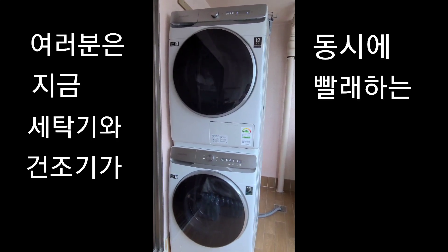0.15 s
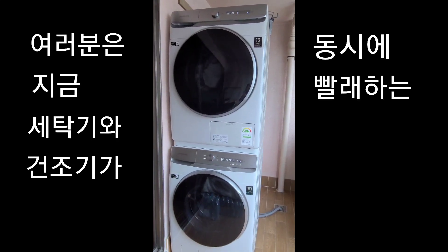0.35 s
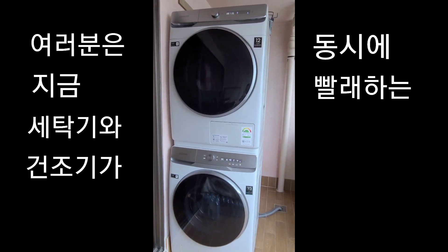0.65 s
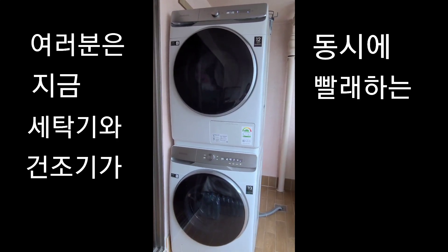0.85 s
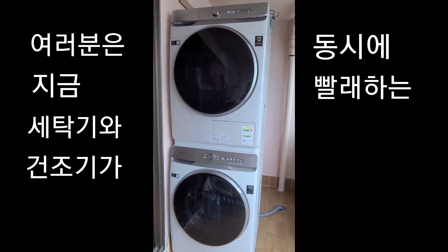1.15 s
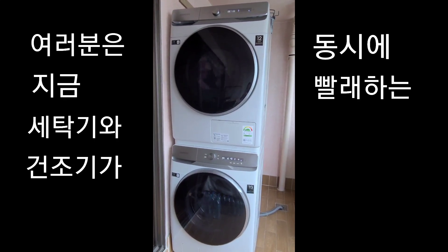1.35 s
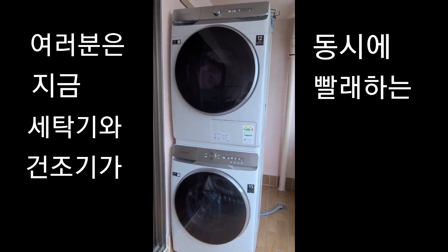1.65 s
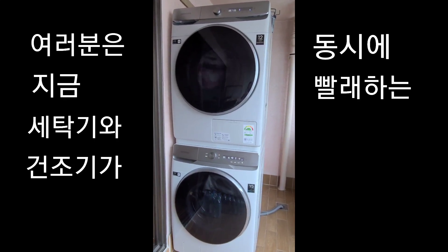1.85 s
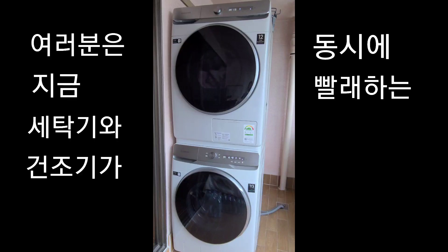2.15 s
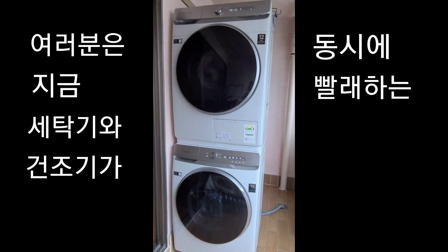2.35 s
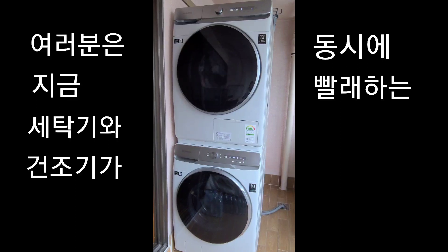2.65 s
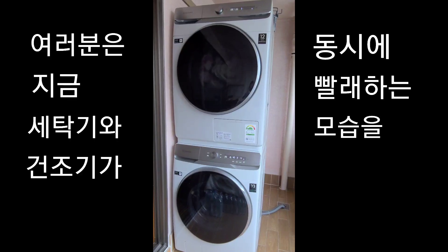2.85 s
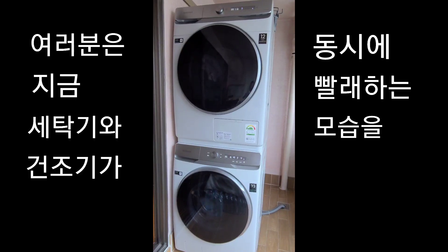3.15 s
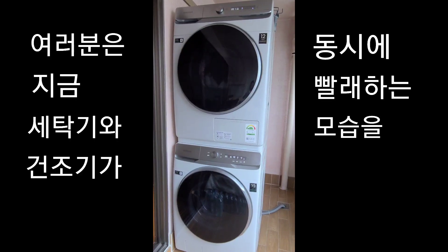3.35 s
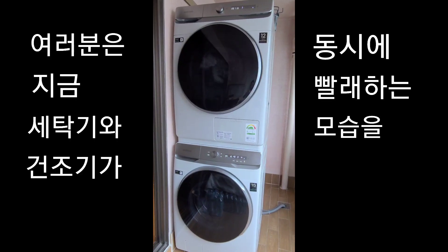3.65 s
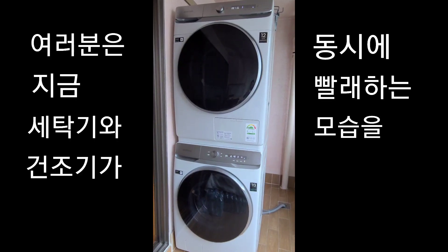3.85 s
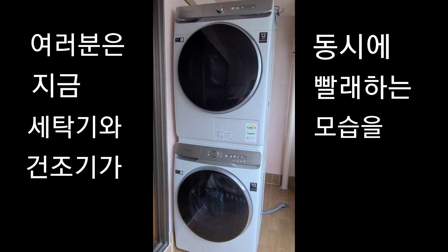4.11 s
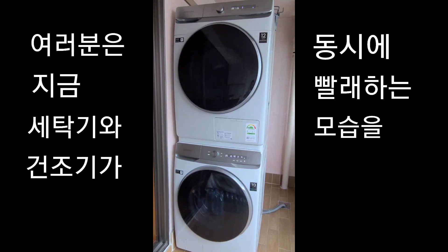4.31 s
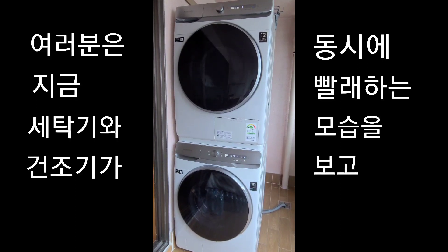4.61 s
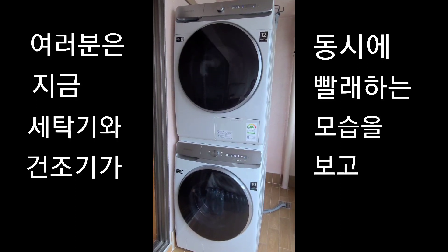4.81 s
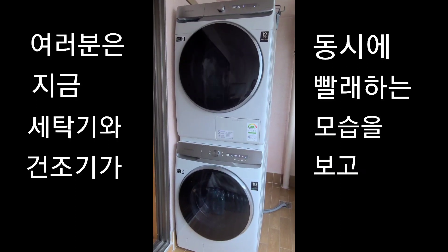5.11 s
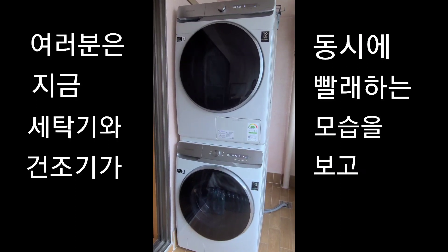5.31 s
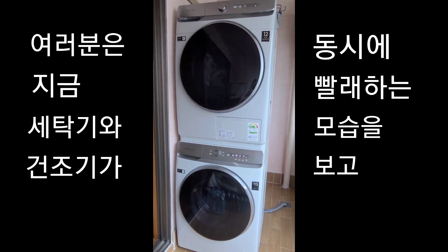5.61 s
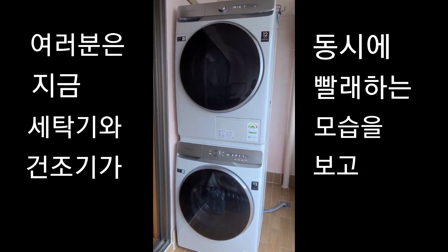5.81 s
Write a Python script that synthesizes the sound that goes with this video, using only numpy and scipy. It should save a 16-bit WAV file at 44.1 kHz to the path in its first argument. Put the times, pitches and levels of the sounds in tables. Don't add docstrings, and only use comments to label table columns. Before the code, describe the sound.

Two laundry machines drone together indoors without stopping. Low compressor and fan hum, a side-panel drone and soft cabinet booms form the bed, topped by unsteady whine, faint buzz and thin airy hiss. Thuds and button knocks scatter throughout; bright ticks cluster in the first half and nearly vanish afterward. Quiet, bass-heavy stereo phone pickup in a small room with little echo.

```python
import sys
import numpy as np
from scipy import signal
from scipy.fft import rfft, irfft, next_fast_len
from scipy.io import wavfile
from scipy.ndimage import uniform_filter1d

SR = 44100
rng = np.random.default_rng(int(sys.argv[2]) if len(sys.argv) > 2 else 0)


def generate_wav(signal):
    frames = np.transpose(np.atleast_2d(signal))
    scaled = np.clip(frames, -1, 1) * 32767
    pcm = np.round(scaled).astype(np.int16)
    wavfile.write(sys.argv[1], SR, pcm)


def linear_from_db(decibels):
    return 10 ** (np.asarray(decibels, float) / 20)


N = 263277

# (frequency [Hz], likeness [0-1], left lead [rad], left minus right [dB])
MIC_PORTS = [(40, .995, .38, -2.3), (120, .95, .2, -1.4), (210, .95, .3, 0), (280, .9, .38, .4),
             (380, .82, 0, .5), (500, .68, -.3, .5), (660, .15, -.6, .5), (900, .35, 1.1, .4),
             (1080, .68, 2.5, 0), (1300, .55, 3.3, -.3), (1900, .3, 3.8, .5), (2300, .45, 6.2, 1.5),
             (3500, .15, 5, .8), (15000, .03, 6, 2.5)]
# (time [s], level [dB])
BUSTLE = [
    (0, 0),
    (.9, 0.5),
    (1.6, 0.5),
    (2.5, 0.7),
    (3.3, 0),
    (4.2, -0.5),
    (5, -0.6),
    (5.97, -0.3),
]
# (time [s], pitch [Hz], level [dB])
PANEL_SWELLS = [(.08, 77.9, -42), (.5, 76, -42.5), (.7, 72, -44), (.97, 76, -47), (1.12, 74.47, -55),
                (2.0, 73, -45), (2.33, 78.9, -39), (2.64, 76.3, -40.5), (2.95, 72.54, -40),
                (3.46, 72.4, -40.5), (3.95, 72, -41), (4.18, 75.5, -43), (4.47, 71.9, -42.5),
                (4.61, 75, -42.5), (4.78, 77.9, -45), (5.3, 75.25, -41.5), (5.57, 73.5, -38),
                (5.76, 75.7, -41.5)]
# (time [s], pitch [Hz], level [dB])
WHINE_SWELLS = [(.07, 770, -51), (.25, 758.3, -50.5), (.47, 768, -47), (0.609, 758, -48),
                (1.04, 761, -46.5), (1.3, 763.5, -53.5), (1.69, 768, -48), (1.88, 770, -48.5),
                (2.2, 765, -45.5), (2.45, 764, -45.5), (2.77, 775, -48.5), (3.029, 759, -45.5),
                (3.37, 762, -49), (3.55, 765.6, -46), (4.0, 756, -49.5), (4.25, 762.4, -47),
                (4.5, 754, -45), (4.8, 770, -50), (5.17, 765.4, -47.5), (5.4, 770, -50.5), (5.7, 759, -44),
                (5.85, 762, -52.5)]
# (frequency [Hz], width [Hz], level [dB])
HOUSING_RINGS = [(4180, 240, -3), (4410, 130, 0), (4670, 140, 0), (5150, 200, -11)]
# (frequency [Hz], width [Hz], level [dB])
DRIVE_WHISTLES = [(8400, 500, -84), (14670, 160, -89), (15180, 160, -89), (15450, 130, -86),
                  (15690, 120, -84)]
# (time [s], level [dB])
CABINET_BOOMS = [(0.151, -40), (.38, -44.5), (.65, -46), (.93, -39), (1.1, -41.5), (1.28, -38.5),
                 (1.55, -47), (1.75, -40.5), (2.3, -47), (2.9, -46), (3.4, -38), (3.9, -42), (4.6, -42.5),
                 (4.95, -39), (5.2, -40.5), (5.65, -42.5)]
# (frequency [Hz], level [dB per Hz])
BOOM_COLOUR = [(60, -11), (86, 0), (98, -4), (125, -2.5), (165, -4), (200, -10)]
RUMBLE_COLOUR = [(16, 6), (33, -8), (55, -4.5), (150, -5), (195, -1), (240, -2), (300, 1), (360, -5),
                 (500, -5), (680, -11.5), (850, -12), (1000, -34), (1300, -26)]
SLOSH_COLOUR = [(700, 6), (1000, -1.5), (1400, 0), (1900, -8.5), (2500, -10.5), (3200, -13), (3800, -15.5),
                (5000, -18.5), (6500, -18)]
AIR_COLOUR = [(3500, -4), (5500, -1), (7000, 0), (9000, -3.5), (12500, -1.5), (14200, -4), (17000, -3)]
# (time [s], peak [dB], centre [Hz], broad crack [dB])
KNOCKS = [(0.032, -53, 1350, -12), (0.2404, -47.5, 1180, -14), (0.4664, -40.5, 1060, 4),
          (0.534, -40.5, 800, 5), (0.9155, -38, 1260, -19), (1.084, -58, 1450, -6), (1.4037, -40, 1305, -2),
          (1.503, -45.5, 1360, -5), (1.8275, -39.5, 1340, -31), (2.181, -47, 1213, 0),
          (2.3184, -49, 1114, -1), (2.4064, -43, 1350, -18), (2.792, -46.5, 1260, -4),
          (3.1507, -50, 1430, -6), (3.2754, -43, 1360, -4), (3.83, -54, 1312, -9), (4.055, -54, 1374, -15),
          (4.561, -50, 1020, -25.5), (4.7052, -58, 1100, -11), (4.8094, -47, 1268, 5),
          (4.854, -49, 1389, 7), (5.1791, -47, 1188, 19), (5.333, -50, 1500, 1), (5.3876, -55, 1080, -6)]
# (time [s], peak [dB], ring [Hz], slap [dB])
THUMPS = [(0.474, -21, 240, -37.5), (0.535, -32.5, 427, -32.5), (0.917, -21, 229.7, -32),
          (1.062, -34.5, 418, -44), (1.409, -34, 315, -34), (2.174, -31.5, 147, -51),
          (2.337, -31, 216, -52), (2.401, -38, 153, -37.5), (2.789, -39, 297.6, -37),
          (3.278, -33.5, 297, -40), (4.68, -34, 173.1, -51), (4.941, -37, 157, -54)]
# (time [s], peak [dB], centre [Hz], broad crack [dB])
TICKS = [(0.6828, -60, 7680, 5), (0.7856, -52, 6013, 14), (0.847, -53, 8260, 12), (0.959, -51, 7860, 11),
         (1.1794, -55, 5520, 5), (1.202, -54, 5960, 9), (1.3988, -55, 6300, 13), (1.7574, -53, 7690, 8),
         (1.7923, -54, 5890, 10), (1.8184, -56, 7230, 5), (1.8845, -46, 7500, 14), (1.9215, -48, 5600, 15),
         (2.0243, -51.5, 6490, 22), (2.1994, -54, 5550, 7), (2.573, -53, 7100, 14), (2.7317, -57, 6690, 7),
         (2.782, -48.5, 7950, 10), (2.8689, -48, 5500, 22), (2.9933, -54, 7820, 6),
         (3.2495, -49.5, 6175, 0), (3.5294, -60, 5505, 4), (5.1768, -52, 12000, 6)]

HUM_HZ, HUM_DB, HUM_SAG_DB_PER_S, HUM_SWAY_DB = 44.8, -42, 0.67, 0.8
FAN_HZ, FAN_DB, FAN_SWAY_DB = 67.73, -47.5, 1
SWAYS_PER_S, SWAY_PEAK_S = 1.664, 0.51
PANEL_S, PANEL_REST_DB = 0.049, -57.5
WHINE_S, WHINE_REST_DB = 0.081, -51
BUZZ_DB, BUZZ_PER_S = -66.5, 117.0
BOOM_DB, BOOM_FOLLOWS, BOOM_S = -46.5, 1.8, 0.051
RUMBLE_DB, RUMBLE_FOLLOWS = -43.5, 0.99
SLOSH_DB, SLOSH_FOLLOWS = -60, 0.88
AIR_DB, AIR_FOLLOWS = -72.5, 0.4
ROOM_T60_S, ROOM_DB = 0.12, -9.5


def rms_one(x):
    return x / np.sqrt(np.mean(x ** 2) + 1e-20)


def in_time(rows):
    s, *columns = np.transpose(rows)
    return [np.interp(np.arange(N) / SR, s, column) for column in columns]


def at_hz(points, hz, column=1):
    points = np.array(points)
    return np.interp(np.log(hz), np.log(points[:, 0]), points[:, column])


def drift(rate):
    r = np.exp(-80 * np.pi * rate / SR)
    slow = signal.lfilter([1], [1, -2 * r, r * r], rng.standard_normal(N // 40 + 2002))[2000:]
    return np.interp(np.arange(N) / 40, np.arange(len(slow)), rms_one(slow - slow.mean()))


def resonate(x, hz, width_hz):
    r = np.exp(-np.pi * width_hz / SR)
    feedback = [1, -2 * r * np.cos(2 * np.pi * hz / SR), r * r]
    return signal.lfilter([(1 - r * r) / 2, 0, (r * r - 1) / 2], feedback, x)


def sway(depth_db):
    return depth_db * np.cos(2 * np.pi * SWAYS_PER_S * (np.arange(N) / SR - SWAY_PEAK_S))


def swells(times, peaks_db, half_s, rest_db):
    t = np.arange(0, N, 64) / SR
    bells = np.exp(-((t - times[:, None]) / half_s) ** 2)
    power = linear_from_db(2 * rest_db) + linear_from_db(2 * peaks_db) @ bells
    return np.interp(np.arange(N) / SR, t, 10 * np.log10(power))


def tone(hz, level_db, wobble_hz, wobble_per_s, flicker_db, lead, pan_db):
    ripple = drift(wobble_per_s)
    ripple -= uniform_filter1d(ripple, size=int(3 * SR / wobble_per_s))
    phase = 2 * np.pi * np.cumsum(hz + wobble_hz * np.tanh(2 * ripple)) / SR
    height = np.sqrt(2) * linear_from_db(level_db + flicker_db * drift(wobble_per_s))
    wave = np.sin(phase + np.array([[lead], [-lead]]) / 2)
    return height * wave * linear_from_db([[pan_db / 2], [-pan_db / 2]])


def compressor_hum():
    level_db = HUM_DB - HUM_SAG_DB_PER_S * np.arange(N) / SR + sway(HUM_SWAY_DB)
    return tone(HUM_HZ, level_db, wobble_hz=0.25, wobble_per_s=4.9, flicker_db=1.1, lead=0.32, pan_db=-2.4)


def fan_hum():
    level_db = FAN_DB + sway(FAN_SWAY_DB)
    return tone(FAN_HZ, level_db, wobble_hz=0.2, wobble_per_s=2.4, flicker_db=2.2, lead=0.33, pan_db=-1.5)


def panel_drone():
    s, _, peak_db = np.transpose(PANEL_SWELLS)
    pitch_hz = in_time(PANEL_SWELLS)[0]
    level_db = swells(s, peak_db, PANEL_S, PANEL_REST_DB)
    return tone(pitch_hz, level_db, wobble_hz=1.5, wobble_per_s=3.0, flicker_db=0.6, lead=0.35, pan_db=-1.8)


def blade_whine():
    s, _, peak_db = np.transpose(WHINE_SWELLS)
    pitch_hz = in_time(WHINE_SWELLS)[0]
    level_db = swells(s, peak_db, WHINE_S, WHINE_REST_DB)
    shared, *own = rng.standard_normal((3, N))
    duct = rms_one(resonate(shared + 0.81 * np.array(own), 769.0, 55))
    blades = tone(pitch_hz, level_db, wobble_hz=10, wobble_per_s=17, flicker_db=0.4, lead=0.75, pan_db=0.3)
    return blades + linear_from_db(level_db - 13.5) * duct


def motor_buzz():
    turn = np.cumsum(BUZZ_PER_S * (1 + 0.01 * drift(9))) / SR
    unevenness = linear_from_db(3.5 * np.tanh(drift(20)) + 1.5 * np.tanh(drift(4)))
    pulses = np.exp(3.9 * (np.cos(2 * np.pi * turn) - 1))
    shared, *own = rng.standard_normal((3, N))
    force = (0.77 + pulses * unevenness) * (0.3 * shared + np.array(own))
    buzz = np.zeros((2, N))
    for k, (hz, width_hz, db) in enumerate(HOUSING_RINGS):
        buzz += (-1) ** k * linear_from_db(db) * resonate(force, hz, width_hz)
    return linear_from_db(BUZZ_DB) * rms_one(buzz)


def drive_whistles():
    out = np.zeros((2, N))
    for hz, width_hz, db in DRIVE_WHISTLES:
        once = resonate(rng.standard_normal((2, N)), hz, width_hz)
        out += linear_from_db(db) * rms_one(resonate(once, hz, width_hz))
    return out


def diffuse_noise(spectrum, patchy_db, flicker_per_s):
    size = next_fast_len(N)
    hz = np.maximum(np.arange(size // 2 + 1) * SR / size, 1)
    shared, left_own, right_own = rfft(rng.standard_normal((3, size)))
    alike = np.clip(at_hz(MIC_PORTS, hz), 0, 1)
    lead = np.exp(0.5j * at_hz(MIC_PORTS, hz, column=2))
    port = lead * linear_from_db(at_hz(MIC_PORTS, hz, column=3) / 2)
    own = np.array([left_own * abs(port), right_own / abs(port)])
    both = np.sqrt(alike) * shared * [port, 1 / port] + np.sqrt(1 - alike) * own
    both = both * linear_from_db(at_hz(spectrum, hz))
    low, high = np.log2([spectrum[0][0], spectrum[-1][0]])
    octave, together, out = np.log2(hz), drift(flicker_per_s / 2), 0
    for centre in np.arange(np.ceil(low), high):
        band = np.clip(1 - abs(octave - centre), 0, 1)
        flicker = 0.92 * together + drift(flicker_per_s)
        out = out + irfft(both * band, size)[:, :N] * linear_from_db(patchy_db * flicker)
    return out / np.sqrt(np.mean(out.mean(axis=0) ** 2))


def air_and_laundry():
    bustle_db, = in_time(BUSTLE)
    boom_rest_db = BOOM_DB + BOOM_FOLLOWS * bustle_db[::64]
    boom_db = swells(*np.transpose(CABINET_BOOMS), BOOM_S, boom_rest_db)
    rumble_db = RUMBLE_DB + RUMBLE_FOLLOWS * bustle_db
    slosh_db = SLOSH_DB + SLOSH_FOLLOWS * bustle_db
    air_db = AIR_DB + AIR_FOLLOWS * bustle_db
    out = linear_from_db(boom_db) * diffuse_noise(BOOM_COLOUR, patchy_db=1.5, flicker_per_s=15.0)
    out += linear_from_db(rumble_db) * diffuse_noise(RUMBLE_COLOUR, patchy_db=0.9, flicker_per_s=25)
    out += linear_from_db(slosh_db) * diffuse_noise(SLOSH_COLOUR, patchy_db=1.07, flicker_per_s=20)
    out += linear_from_db(air_db) * diffuse_noise(AIR_COLOUR, patchy_db=1.04, flicker_per_s=12)
    return out


def rattles(events, length_s, clicks_per_s, sharpness, first_db, low_hz, high_hz):
    out, t = np.zeros((2, N)), np.arange(int(0.1 * SR)) / SR
    broad = signal.butter(2, [low_hz, high_hz], "band", fs=SR, output="sos")
    fade = np.exp(-(t / length_s) ** 1.3) * (1 - 0.35 * np.exp(-t / 0.003))
    for s, peak_db, hz, broad_db in events:
        happens = rng.random((3, len(t))) < clicks_per_s / SR
        shared, *own = rng.standard_normal((3, len(t))) * happens
        clicks = (0.28 * shared + np.array(own)) * fade
        clicks[:, 0] = linear_from_db(first_db)
        panel = resonate(resonate(clicks, hz, hz / sharpness), hz, hz / sharpness)
        crack = rms_one(signal.sosfilt(broad, clicks))
        burst = rms_one(panel) + linear_from_db(broad_db) * crack
        at = round(s * SR)
        out[:, at:at + len(t)] += linear_from_db(peak_db) * burst / abs(burst.mean(axis=0)).max()
    return out


def button_knocks():
    return rattles(KNOCKS, length_s=0.02, clicks_per_s=2500, sharpness=3.1, first_db=6, low_hz=600, high_hz=2530)


def thumps():
    out, t = np.zeros(N), np.arange(int(0.15 * SR)) / SR
    cloth = signal.butter(3, [340, 880], "band", fs=SR, output="sos")
    push = (t / 0.0031) ** 2 * np.exp(-t / 0.0021)
    bounce = 0.77 * np.interp(t - 0.0095, t, push, left=0)
    after = 0.16 * (1 - np.exp(-t / 0.016)) * np.exp(-t / 0.018)
    for s, peak_db, hz, slap_db in THUMPS:
        ring = (push + bounce) * np.sin(2 * np.pi * hz * t) + after * np.sin(2 * np.pi * 1.15 * hz * t)
        slap = signal.sosfilt(cloth, rng.standard_normal(len(t)) * np.exp(-t / 0.023))
        at = round(s * SR)
        out[at:at + len(t)] += linear_from_db(peak_db) * ring / abs(ring).max() + linear_from_db(slap_db + 2) * slap / abs(slap).max()
    return np.array([out, np.roll(out, 8)])


def zip_ticks():
    ticks = rattles(TICKS, length_s=0.017, clicks_per_s=11000, sharpness=3.5, first_db=6,
                    low_hz=1800, high_hz=8000)
    return linear_from_db(0.5) * ticks


def room(x):
    t = np.arange(int(0.4 * SR)) / SR
    dull_noise = signal.lfilter([0.4], [1, -0.6], rng.standard_normal((2, len(t))))
    tail = dull_noise * linear_from_db(-60 * t / ROOM_T60_S) * (t > 0.004)
    tail /= np.sqrt(np.sum(tail ** 2, axis=1, keepdims=True))
    return linear_from_db(ROOM_DB) * signal.fftconvolve(x, tail, axes=1)[:, :N]


def scene():
    tones = compressor_hum() + fan_hum() + panel_drone() + blade_whine() + motor_buzz() + drive_whistles()
    contacts = button_knocks() + zip_ticks()
    return tones + air_and_laundry() + thumps() + contacts + room(contacts)


def starved_band(x, low_hz, high_hz):
    band_pass = signal.butter(6, [low_hz, high_hz], "band", fs=SR, output="sos")
    band = signal.sosfiltfilt(band_pass, x)
    dropped = np.clip(4 * (drift(14) - 0.25), 0, 1)
    return x - band * dropped


def top_cut(x):
    return signal.sosfilt(signal.butter(12, 15765, fs=SR, output="sos"), x)


def record(dry):
    mix = starved_band(dry, low_hz=14000, high_hz=14600)
    return top_cut(mix)


dry = scene()
out = record(dry)
generate_wav(out)
```